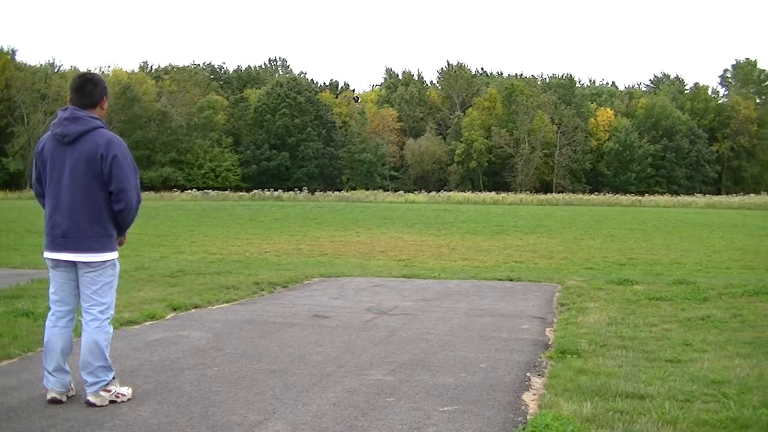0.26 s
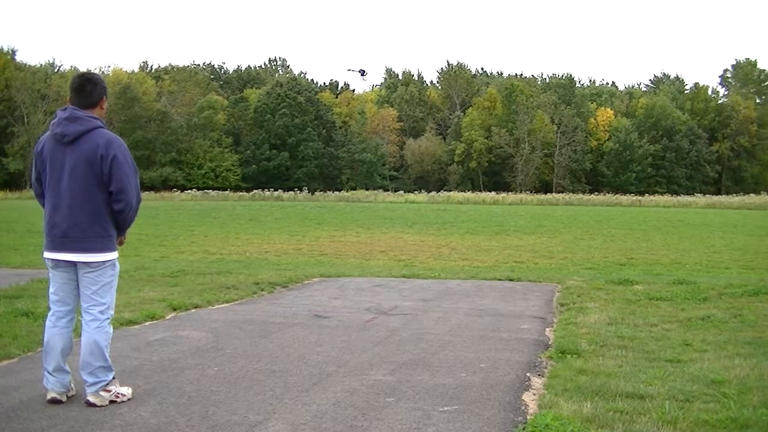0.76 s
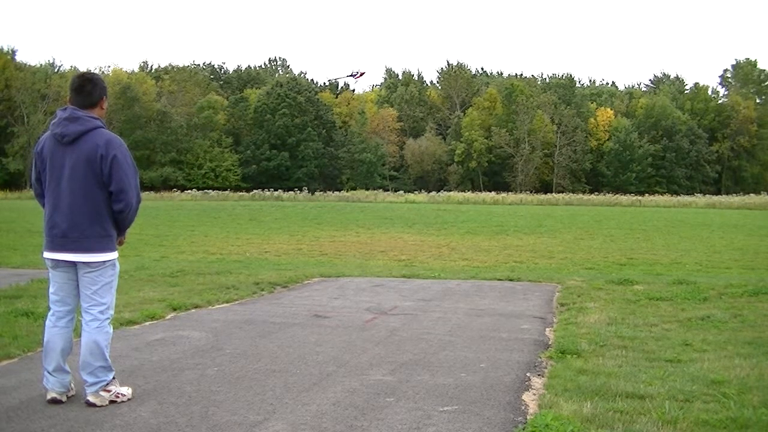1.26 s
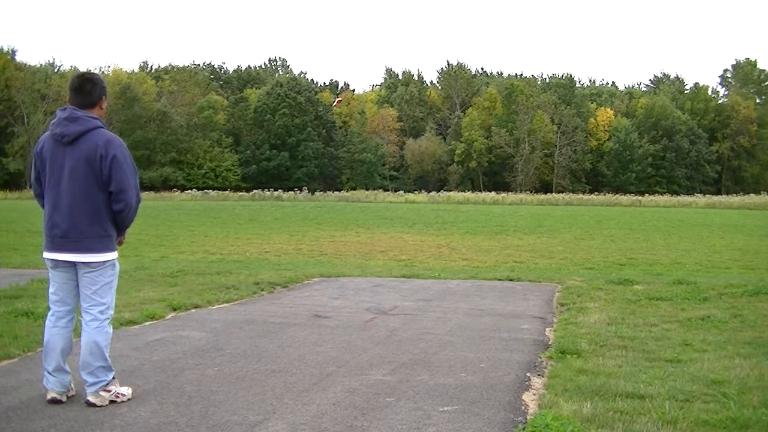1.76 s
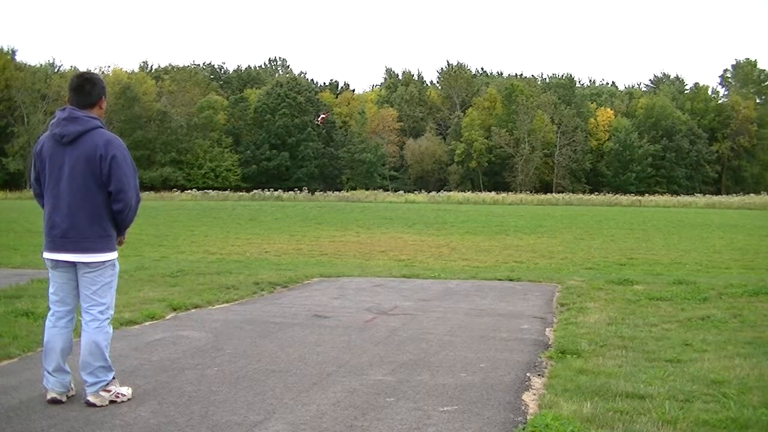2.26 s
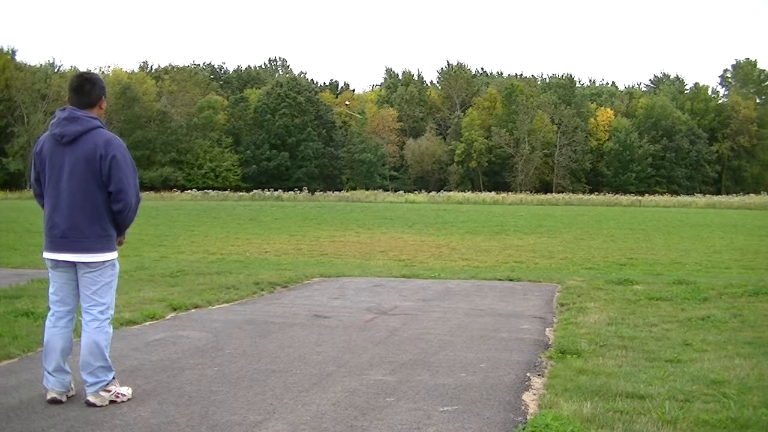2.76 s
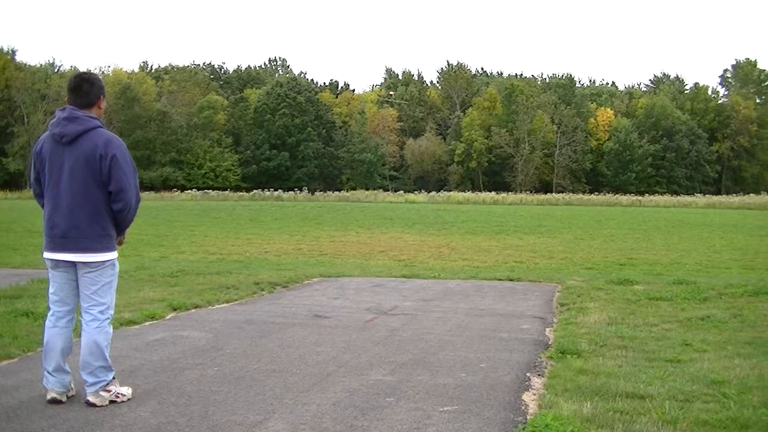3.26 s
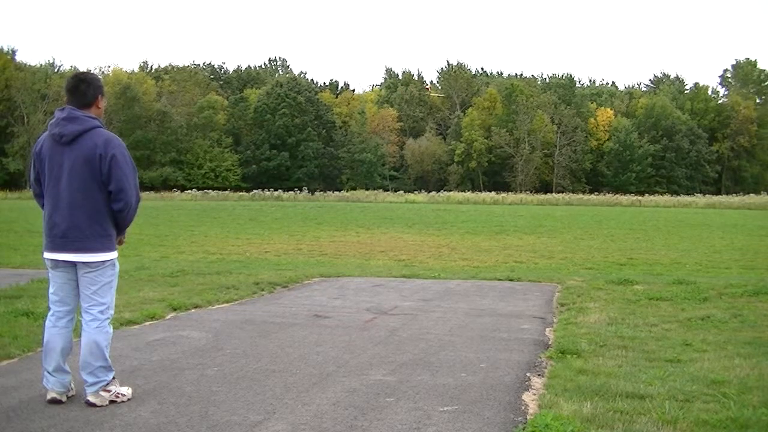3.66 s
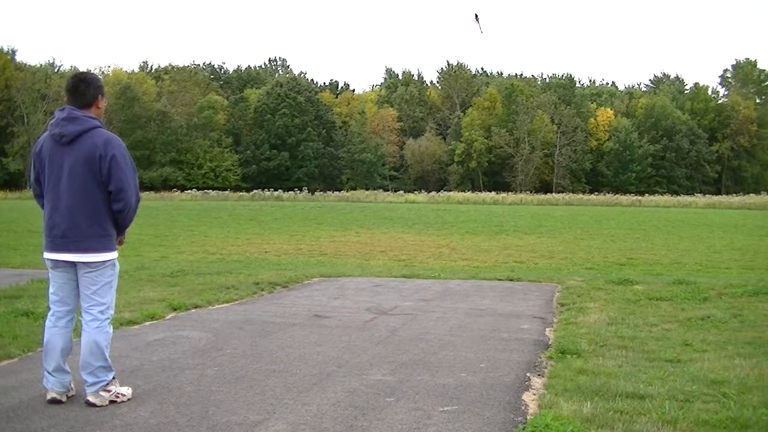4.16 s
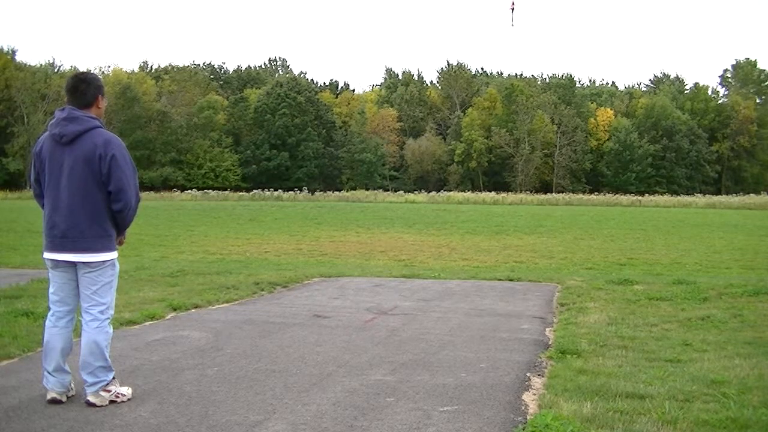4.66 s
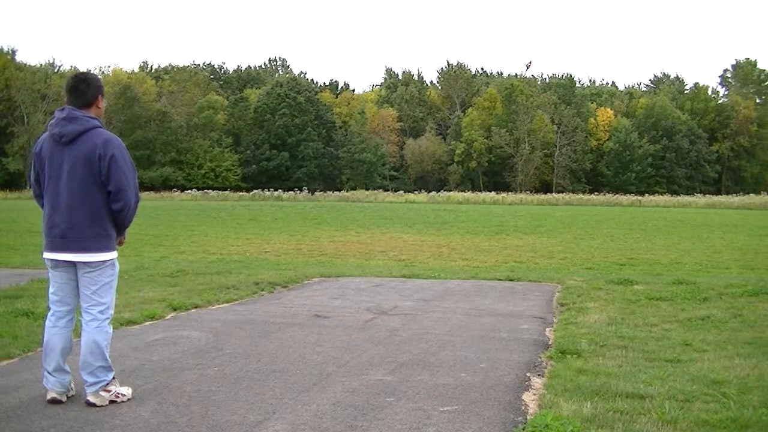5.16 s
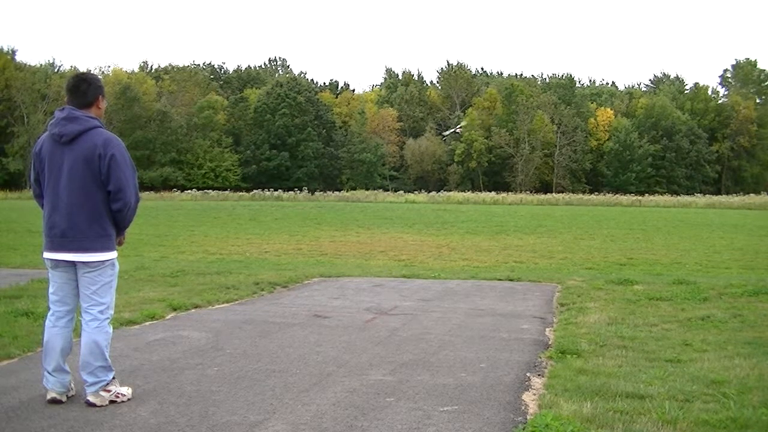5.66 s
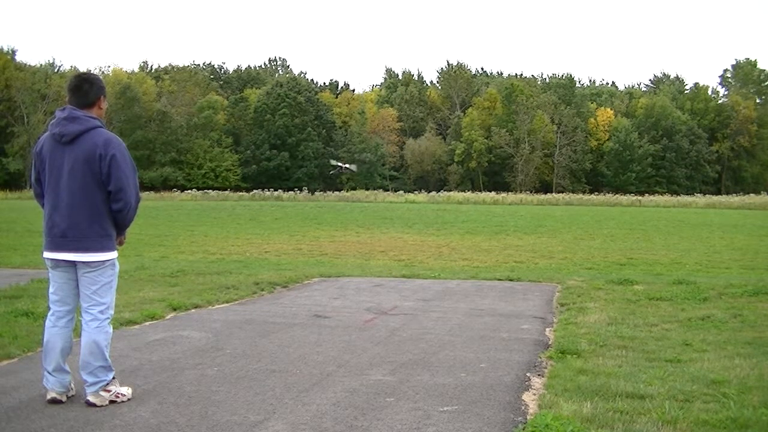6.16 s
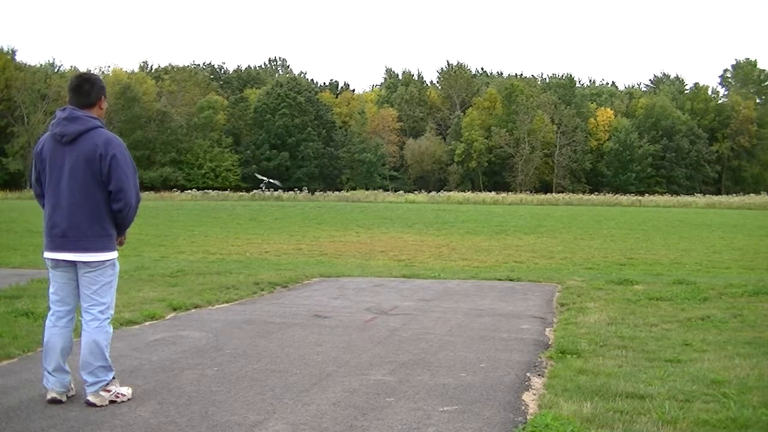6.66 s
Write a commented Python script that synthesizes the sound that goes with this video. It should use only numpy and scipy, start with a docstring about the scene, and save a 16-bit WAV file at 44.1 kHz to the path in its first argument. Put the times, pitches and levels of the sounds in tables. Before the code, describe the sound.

An electric model helicopter flies over an open field for about seven seconds. High motor and gear tones swell and fade over a rotor hum, tail buzz and airy blade swish, which sweeps in pitch as the height changes. From about 1.2 to 3 seconds, hard turns bring rapid blade slapping and a throbbing roar, loudest in the first half, with a swoop at 1.7 seconds. The sound eases until 4 seconds, when the whine flares and briefly sags in pitch. From 4.2 to 5.4 seconds comes a run of about five short, rasping bursts of blade slap. At 5.5 seconds the helicopter dives with a whoosh, followed by the sharpest blade cracks around 6 to 6.3 seconds and a last, softer whoosh at 6.7 seconds. Distant trees return a faint, dull echo throughout.

```python
"""An electric model helicopter flies aerobatics over a field. Throughout, shaft speed drives rotor hum,
tail buzz, drive whine and blade slap; a ground reflection sweeps the blade noise as the height changes.
From 1.2 to 3 s hard pulls slap and roar as the blades strike their wake, with a swoop at 1.7 s.
At 4 s the rotor sags, then a run of short pulls follows, flown high. From 5.5 s it dives:
a whoosh, the sharpest cracks near 6 s, a last whoosh at 6.7 s. Far trees return a faint wash."""
import sys
import numpy as np
from scipy import signal
from scipy.fft import rfft, irfft
from scipy.io import wavfile
from scipy.ndimage import uniform_filter1d, map_coordinates

SR = 44100
rng = np.random.default_rng(int(sys.argv[2]) if len(sys.argv) > 2 else 0)


def wrap_up_sound(samples):
    """Save the sound to the file named by the first command line argument, as 16-bit audio."""
    columns = np.atleast_2d(samples).T
    # keep every value between -1 and 1, then stretch to whole-number steps
    tamed = np.clip(columns, -1, 1)
    steps = np.round(tamed * 32767).astype(np.int16)
    wavfile.write(sys.argv[1], SR, steps)


N = 304731
TIME_S = np.arange(N) / SR
BINS_HZ = np.fft.rfftfreq(N, 1 / SR)

# Governed main rotor speed, sagging under load: time_s, speed_rev_per_s
HEAD_SPEED = [(0.0, 39.27), (.3, 38.53), (1.04, 39.42), (1.44, 39.01), (1.78, 38.85), (2.27, 38.15),
              (3.1, 38.64), (3.73, 38.7), (4.008, 36.6), (4.25, 38.8), (4.44, 39.28), (4.85, 39.02),
              (5.27, 39.28), (5.58, 38.76), (6.0, 39.61), (6.91, 40.15)]
# Main rotor effort: time_s, swish_db, tip_hiss_db
BLADE_LOAD = [(0, -18.5, -25.5), (.2, -29.5, -29), (.74, -28.5, -30), (1.22, -18, -22), (1.65, -18.5, -24),
              (2.02, -19.5, -29.5), (2.17, -30, -31.5), (2.52, -35, -36.5), (3.96, -34, -32.5),
              (4.12, -28, -32.5), (4.36, -30.5, -33.5), (4.48, -24.5, -32), (4.76, -28, -34.5),
              (4.96, -25.5, -34), (5.6, -26, -28), (6.3, -32, -31.5), (6.35, -35.5, -35),
              (6.55, -33.5, -33.5), (6.91, -33, -39.5)]
# Roar pitch, highest near 2 s, lowest while flying high at 4-5 s: time_s, pitch_ratio
ROAR_SHIFT = [(0, 1.1), (1.55, 1.145), (2.15, 1.48), (3.7, 1.3), (4.15, 0.83), (4.9, .84), (5.4, 0.91),
              (6.91, 1.15)]
# Microphone treble by direction of arrival: time_s, notch_ratio, fizz_re_hiss_db
MIC_TREBLE = [(0, 0.98, -22), (.8, 1.06, -20), (1.3, 0.97, -27.5), (2.3, 1.02, -23), (3.3, 1.07, -25.5),
              (4.3, 1.033, -27.5), (5.2, 1.03, -28.5), (5.85, 1.035, -30), (6.45, 0.98, -21),
              (6.91, 1.12, -19)]
# Swells of low rushing air: centre_s, half_width_s, level_db
RUSH_SWELLS = [(1.0, .2, -47), (1.88, 0.11, -48), (2.86, 0.18, -42), (3.9, 0.28, -47.5), (5.3, 0.11, -48.5)]
# Wake strikes and stall: start_s, end_s, slap_db, sharpness_frac, rasp_hz, roar_db
HARD_PULLS = [(0, 0.078, -35, 0.8, 2000, -36), (.15, 0.454, -43, .1, 1200, -35.5),
              (1.25, 1.595, -27, 0.2, 1060, -26), (1.725, 2.027, -28.5, 0.4, 1350, -26.5),
              (2.11, 2.33, -30, 0.4, 1340, -32.5), (2.38, 2.56, -32.5, 0, 1290, -31.5),
              (2.61, 2.94, -42, .03, 1220, -38), (4.153, 4.31, -33.7, 0.07, 1700, -31.5),
              (4.45, 4.587, -33, 0.13, 1760, -38), (4.656, 4.797, -31.5, 0.27, 1800, -32),
              (4.877, 5.052, -30.5, 0.2, 1690, -31), (5.18, 5.355, -33.5, .4, 1640, -31),
              (5.91, 5.98, -31, 1, 2020, -35), (6.087, 6.3, -30.5, 1, 2019, -29.5),
              (6.457, 6.91, -50, .3, 1350, -32)]
# Swoops: centre_s, half_width_s, level_db
WHOOSH_SWELLS = [(1.68, 0.24, -30), (5.67, 0.16, -36.5), (6.7, 0.29, -42.5)]

# Air noise spectra, before any pitch shift: freq_hz, density_db
ROAR_SPECTRUM = [(100, -46), (330, -35), (480, -10.5), (680, 1.5), (950, 1), (1300, -0.5), (2600, -22.5),
                 (16000, -75)]
SWISH_SPECTRUM = [(200, -75), (900, -11), (1400, -2.5), (1950, 2.5), (2700, -1), (3500, -6), (5000, -6.5),
                  (9000, -39), (16000, -59)]
HISS_SPECTRUM = [(500, -48), (2500, -4.5), (4000, -3), (5500, 0.5), (7000, -2), (8400, -6.5), (9300, -13),
                 (9900, -19.5), (10500, -19), (11600, -33), (15800, -55)]
FIZZ_SPECTRUM = [(4000, -32), (9200, -6), (9900, -5), (10500, -0.5), (11200, -3), (11750, -0.5), (12500, 2),
                 (14500, -3), (15800, -7.5)]
RUSH_SPECTRUM = [(20, -46), (50, -36), (100, -19), (150, -14.5), (200, 1.5), (260, 3.5), (340, -7.5),
                 (500, 5), (900, -20), (16000, -80)]
WHOOSH_SPECTRUM = [(100, -80), (1500, -26), (2600, -7), (3150, 0.5), (3700, -6.5), (5500, -28),
                   (16000, -70)]
# Blunt and sharp slap filters: freq_hz, gain_db
THUD_SPECTRUM = [(30, -70), (250, -11), (500, 3), (850, -9), (1300, -2), (2600, -4), (4500, -18),
                 (8000, -25), (16000, -58)]
CRACK_SPECTRUM = [(30, -65), (300, -10), (600, 0.5), (1150, -9), (1900, 3.5), (5000, 1.5), (8000, -11.5),
                  (10500, -27), (16000, -44)]

# Main drone and tail buzz partials: cycles_per_own_shaft_rev, level_db
DRONE_PARTIALS = [(6, -9), (8, -0.5), (10, -3), (12, -1), (14, -4), (16, -5.5), (18, -4)]
BUZZ_PARTIALS = [(1, -13), (4, 4.5), (5, -6), (6, -0.5), (8, -5)]
# Beaming as the main disc tilts: time_s, hum_db, drone_db
MAIN_LEVELS = [(0, -62.5, -58), (1.5, -62.5, -61.5), (2.0, -55, -51), (2.7, -69.5, -59.5), (4.2, -65, -64),
               (5.05, -58.5, -71), (5.7, -70, -60), (6.05, -57.5, -47.5), (6.35, -52, -45.5),
               (6.91, -58, -73)]
# Beaming as the tail swings: time_s, blade_tone_db, buzz_db
TAIL_LEVELS = [(0, -42.5, -42.5), (.45, -45, -43), (.9, -46.5, -44), (1.2, -54.5, -44.5), (1.5, -51.5, -38),
               (2.15, -47.5, -56.5), (3.0, -43, -48.5), (3.65, -48, -50.5), (3.97, -45, -43),
               (4.55, -45.5, -45.5), (5.35, -54.5, -41), (5.7, -51.5, -57), (6.07, -48, -43),
               (6.45, -44, -55), (6.91, -40, -61)]
# Motor and gear lines: tone_name
DRIVE_TONES = ["motor low", "motor high", "gear mesh", "motor octave"]
# Their pitches, in the same order: cycles_per_main_rev
DRIVE_ORDERS = [66.55, 93.12, 179.75, 186.2]
# Narrowly beamed tones at rest: tone_name, level_db
OFF_AXIS_DB = {"motor low": -49, "motor high": -46.5, "gear mesh": -53, "motor octave": -53, "tail third":
               -57.5}
# The turning body aims a tone at the microphone: tone_name, centre_s, half_width_s, level_db
ON_AXIS_SWELLS = [("motor low", 0.78, 0.25, -34), ("motor low", 1.51, 0.21, -30.5),
                  ("motor low", 2.48, 0.34, -42.5), ("motor low", 4.095, 0.063, -34.5),
                  ("motor low", 4.47, .17, -39), ("motor low", 5.3, 0.27, -41.5),
                  ("motor low", 5.655, 0.069, -32.5), ("motor low", 6.72, 0.21, -35),
                  ("motor high", .63, .12, -40), ("motor high", 1.203, 0.087, -35.5),
                  ("motor high", 1.65, 0.12, -40), ("motor high", 2.46, 0.21, -44),
                  ("motor high", 4.08, .055, -33), ("motor high", 4.42, 0.049, -39),
                  ("motor high", 5.25, .1, -42), ("motor high", 5.92, 0.069, -38.5),
                  ("motor high", 6.33, 0.057, -42.5), ("gear mesh", 1, 0.23, -38.5),
                  ("gear mesh", 0.37, .12, -46), ("gear mesh", 4.7, .11, -45),
                  ("motor octave", 0.26, .42, -41.5), ("motor octave", 3.1, 0.4, -46.5),
                  ("motor octave", 4.08, .05, -42), ("tail third", 0.81, 0.25, -45),
                  ("tail third", 2.31, 0.31, -48), ("tail third", 4.24, 0.15, -41.5),
                  ("tail third", 5.95, 0.43, -50)]

# Ground reflection, later when flying high: time_s, lag_ms, strength_frac
GROUND_BOUNCE = [(0, .91, .4), (.3, .947, .55), (.9, 1.15, .68), (1.3, 1.07, .64), (2.2, .69, .45),
                 (2.7, .81, .56), (3.82, .9, .55), (4.2, 1.24, .35), (4.6, 1.42, .22), (5.05, 1.26, .2),
                 (5.55, .72, .42), (5.95, .445, .55), (6.3, .345, .42), (6.91, .355, .5)]


def blade_air(turns, slap_db, roar_db):
    """Blade turbulence throbs with each main and tail blade pass, over a low rush of air."""
    swish_db, hiss_db = curves(BLADE_LOAD)
    notch_ratio, fizz_re_hiss_db = curves(MIC_TREBLE)
    fizz_db = hiss_db + fizz_re_hiss_db
    # more slap relative to swish: deeper throb
    depth = np.minimum(0.052 + 0.059 * gain_of(slap_db - swish_db), 0.4)
    main_beat = 1 + depth * np.cos(4 * np.pi * turns) + 0.017 * np.cos(2 * np.pi * turns)
    tail_beat = 1 + 0.15 * np.cos(4 * np.pi * tail_turns(turns))
    throb = unit_rms(main_beat * tail_beat * gain_of(0.28 * drift(27)))
    roar = pitch_shifted(noise(ROAR_SPECTRUM), *curves(ROAR_SHIFT)) * gain_of(roar_db - 6)
    swish = noise(SWISH_SPECTRUM) * gain_of(swish_db - 4.5)
    hiss = pitch_shifted(noise(HISS_SPECTRUM), notch_ratio) * gain_of(hiss_db - 2.43)
    fizz = pitch_shifted(noise(FIZZ_SPECTRUM), notch_ratio) * gain_of(fizz_db + 1)
    rush_db = swell_db(RUSH_SWELLS, rest_db=-50.5)
    rush = noise(RUSH_SPECTRUM) * gain_of(rush_db + 2 + drift(5.2))
    return throb * (roar + swish + hiss + fizz) + rush


def blade_slap(turns, level_db, sharpness, rasp_hz, burst_s=0.0009, burst_frac=0.78):
    """Blades cut tip vortices: a pressure spike and a short ragged burst per cut."""
    spikes = vortex_cuts(turns)
    # sharp turns: an older vortex is met later in the sweep
    spikes += 0.45 * (0.29 + sharpness) * vortex_cuts(turns - 0.15 + 0.023 * drift(5))
    burst_envelope = signal.lfilter([1], [1, -np.exp(-1 / (burst_s * SR))], spikes)
    bursts = burst_envelope * rng.standard_normal(N)
    pressure = power_mix(unit_rms(spikes), unit_rms(bursts), burst_frac)
    thud = coloured(pressure, THUD_SPECTRUM)
    rasp = unit_rms(resonate(thud, rasp_hz, width_hz=600))  # pitch set by vortex core size
    blunt = unit_rms(rasp + 0.64 * thud)
    crack = coloured(pressure, CRACK_SPECTRUM)
    return gain_of(level_db - 2.5) * power_mix(blunt, crack, sharpness)


def vortex_cuts(turns, jitter_rev=0.004, imbalance=0.12, spread_db=1.0):
    """One impulse per pass of two unequal blades."""
    passes = np.maximum.accumulate(np.floor(2 * (turns + jitter_rev * drift(40))))
    size = (1 + imbalance * np.cos(np.pi * passes)) * gain_of(spread_db * np.clip(drift(67), -1, 1))
    return np.diff(passes, prepend=passes[0]) * size


def pull_controls(attack_s=0.053, release_s=0.025,
                  easy_slap_db=-42, easy_sharpness=0.1, easy_rasp_hz=1220, easy_roar_db=-35):
    """Slap and stall roar curves: each pull sets in, holds and lets go, on top of easy flight."""
    start_s, end_s, slap_db, sharpness, rasp_hz, roar_db = np.transpose(HARD_PULLS)[:, :, None]
    before_s, after_s = np.maximum(start_s - TIME_S, 0), np.maximum(TIME_S - end_s, 0)
    held = np.exp(-(before_s / attack_s) ** 2 - (after_s / release_s) ** 2)
    held /= np.maximum(held.sum(0), 1)
    hard_power, easy_power = held * gain_of(slap_db) ** 2, gain_of(easy_slap_db) ** 2
    slap_power = hard_power.sum(0) + easy_power
    roar_power = (held * gain_of(roar_db) ** 2).sum(0) + gain_of(easy_roar_db) ** 2
    mean_sharpness = ((hard_power * sharpness).sum(0) + easy_power * easy_sharpness) / slap_power
    mean_rasp_hz = ((hard_power * rasp_hz).sum(0) + easy_power * easy_rasp_hz) / slap_power
    return 10 * np.log10(slap_power), mean_sharpness, mean_rasp_hz, 10 * np.log10(roar_power)


def swoop_whoosh():
    """Air sheds off the blade edges in a narrow band that swells with each swoop."""
    return noise(WHOOSH_SPECTRUM) * gain_of(swell_db(WHOOSH_SWELLS, rest_db=-52.5))


def rotor_tones(turns):
    """The main rotor hums and drones; the tail rotor sings at its blade rate and buzzes."""
    hum_db, drone_db = curves(MAIN_LEVELS)
    tone_db, buzz_db = curves(TAIL_LEVELS)
    third_db = beamed_db("tail third")
    hum = partial(turns, order=4, blur_rad=0.23)
    hum += gain_of(-18.5) * partial(turns, order=2, blur_rad=0.15, flutter_db=-5)
    drone = sum(gain_of(db) * partial(turns, order, blur_rad=0.18) for order, db in DRONE_PARTIALS)
    tail_shaft = tail_turns(turns)
    tone = partial(tail_shaft, order=2, blur_rad=0.17)
    third = partial(tail_shaft, order=3, blur_rad=0.57)
    buzz = sum(gain_of(db) * partial(tail_shaft, order, blur_rad=0.54, flutter_db=2.5)
               for order, db in BUZZ_PARTIALS)
    main = hum * gain_of(hum_db + 1) + drone * gain_of(drone_db + 0.2)
    tail = tone * gain_of(tone_db) + third * gain_of(third_db - 1) + buzz * gain_of(buzz_db - 4)
    return main + tail


def drive_whine(turns, shake_rev=0.00016):
    """Motor and gear lines; the main and tail shafts shake them, raising faint sidebands."""
    shaken = turns + shake_rev * np.sin(4 * np.pi * turns)
    runout = 1 + 0.23 * np.cos(2 * np.pi * tail_turns(turns))
    lines = sum(gain_of(beamed_db(name)) * partial(shaken, order, blur_rad=0.12, flutter_db=1.42)
                for name, order in zip(DRIVE_TONES, DRIVE_ORDERS))
    return runout * lines


def tail_turns(turns, gear_ratio=5.175):
    """The tail shaft is geared up from the main shaft."""
    return gear_ratio * turns


def partial(turns, order, blur_rad, flutter_db=1.5):
    """A shaft-locked line; moving air flutters its phase and level."""
    phase_rad = 2 * np.pi * (order * turns + rng.random()) + blur_rad * drift(25)
    return np.sqrt(2) * np.sin(phase_rad) * gain_of(flutter_db * drift(20))


def beamed_db(tone_name, fade_db=1.2, fade_hz=3):
    """A tone's level wavers at rest and swells when aimed at the microphone."""
    swells = [row[1:] for row in ON_AXIS_SWELLS if row[0] == tone_name]
    return swell_db(swells, rest_db=OFF_AXIS_DB[tone_name] + fade_db * drift(fade_hz))


def over_ground(x, dull_hz=3200, scatter_hz=12000, grazing_rad=2.5, grazing_ms=0.6):
    """Direct sound plus a late, duller ground copy: comb notches that slide with height."""
    lag_ms, strength = curves(GROUND_BOUNCE)
    mirrored = rfft(x) / (1 + (BINS_HZ / scatter_hz) ** 6)
    bright = irfft(mirrored, N)
    dull = irfft(mirrored / np.sqrt(1 + (BINS_HZ / dull_hz) ** 2), N)
    # at grazing angles grass keeps more treble and delays the phase
    grazing = np.exp(-lag_ms / grazing_ms)
    reflected = dull + grazing * (bright - dull)
    late = map_coordinates(reflected, [np.arange(N) - lag_ms * SR / 1000], order=3)
    bounce = (signal.hilbert(late) * np.exp(-1j * grazing_rad * grazing)).real
    return (x + strength * bounce) / np.sqrt(1 + strength ** 2)


def tree_echo(x, delay_s=0.25, rise_s=0.028, t60_s=1.0, dull_hz=2500):
    """The far tree line scatters back a dull wash."""
    age_s = np.arange(SR) / SR
    taps = rng.standard_normal(SR) * gain_of(-60 * age_s / t60_s) * (1 - np.exp(-age_s / rise_s))
    wash = signal.fftconvolve(x, taps / np.linalg.norm(taps))[:N]
    wash = irfft(rfft(wash) / (1 + (BINS_HZ / dull_hz) ** 2), N)
    return np.interp(TIME_S - delay_s, TIME_S, wash, left=0)


def gain_of(db):
    """Decibels to amplitude."""
    return 10 ** (np.asarray(db) / 20)


def unit_rms(x):
    """Scale to rms 1."""
    return x / np.sqrt(np.mean(x ** 2) + 1e-20)


def power_mix(a, b, b_frac):
    """Equal-power crossfade."""
    b_frac = np.clip(b_frac, 0, 1)
    return np.sqrt(1 - b_frac) * a + np.sqrt(b_frac) * b


def curves(rows):
    """Table columns, interpolated linearly over time."""
    time_s, *columns = np.transpose(rows)
    return [np.interp(TIME_S, time_s, column) for column in columns]


def swell_db(swells, rest_db):
    """Round-topped swells over a resting level, summed in power."""
    power = sum(gain_of(db) ** 2 / (1 + ((TIME_S - centre_s) / half_width_s) ** 6)
                for centre_s, half_width_s, db in swells)
    return 10 * np.log10(gain_of(rest_db) ** 2 + power)


def coloured(x, spectrum):
    """Filter by a spectrum table; rms 1."""
    freq_hz, gain_db = np.transpose(spectrum)
    bin_db = np.interp(np.log(BINS_HZ + 1), np.log(freq_hz), gain_db)
    return unit_rms(irfft(rfft(x) * gain_of(bin_db), N))


def noise(spectrum):
    """Shaped Gaussian noise; rms 1."""
    return coloured(rng.standard_normal(N), spectrum)


def drift(rate_hz):
    """Smooth random motion up to about rate_hz; rms 1."""
    return unit_rms(irfft(rfft(rng.standard_normal(N)) / (1 + (BINS_HZ / rate_hz) ** 4), N))


def pitch_shifted(x, ratio):
    """Slide a noise's spectrum by variable-rate resampling."""
    return map_coordinates(x, [np.cumsum(ratio) % (N - 1)], order=3)


def resonate(x, centre_hz, width_hz):
    """Unity-gain resonance with a moving centre."""
    carrier = np.exp(2j * np.pi * np.cumsum(centre_hz) / SR)
    pole = np.exp(-np.pi * width_hz / SR)
    baseband = signal.lfilter([(1 - pole) ** 2], [1, -2 * pole, pole * pole], x / carrier)
    return 2 * (carrier * baseband).real


def scene(inertia_s=0.15):
    """One shaft, smoothed by rotor inertia, times the parts; one microphone feeds both channels."""
    speed_rev_per_s = uniform_filter1d(curves(HEAD_SPEED)[0], round(inertia_s * SR), mode="nearest")
    turns = np.cumsum(speed_rev_per_s) / SR + 0.11
    slap_db, sharpness, rasp_hz, roar_db = pull_controls()
    air = blade_air(turns, slap_db, roar_db)
    slap = blade_slap(turns, slap_db, sharpness, rasp_hz)
    helicopter = over_ground(air + slap + swoop_whoosh()) + rotor_tones(turns) + drive_whine(turns)
    field = helicopter + gain_of(-19) * tree_echo(helicopter)
    return np.array([field, field])


def record(dry, wind_cut_hz=48, band_limit_hz=15750):
    """The camera's wind filter and band limit."""
    highpass = signal.butter(2, wind_cut_hz, "highpass", fs=SR, output="sos")
    lowpass = signal.firwin(511, band_limit_hz, window=("kaiser", 9), fs=SR)
    return signal.oaconvolve(signal.sosfilt(highpass, dry), lowpass[None], "same")


dry = scene()
out = record(dry)
wrap_up_sound(out)
```